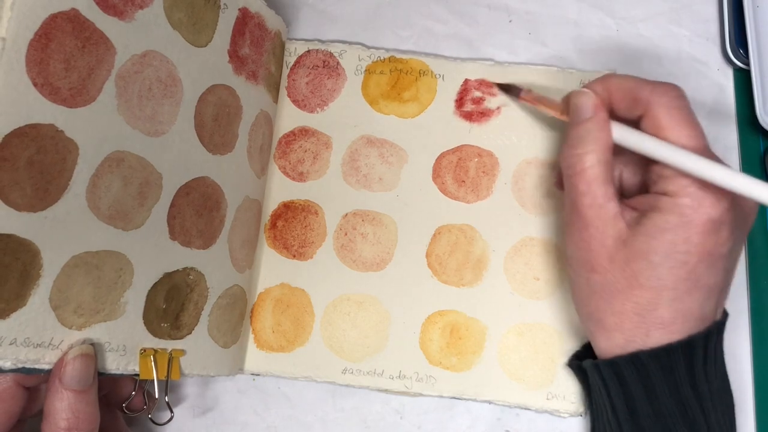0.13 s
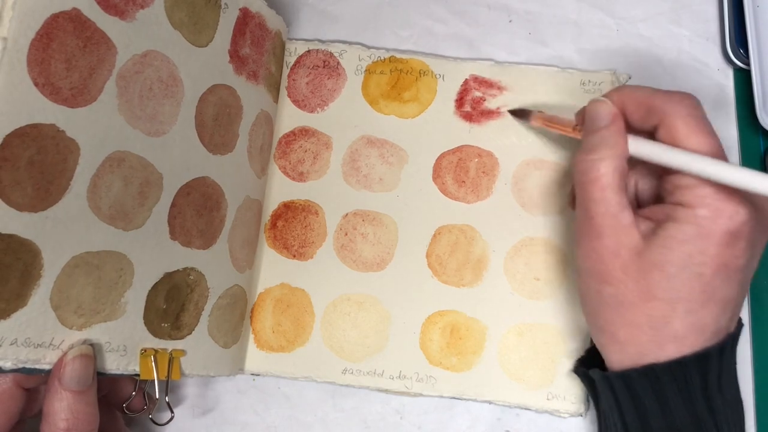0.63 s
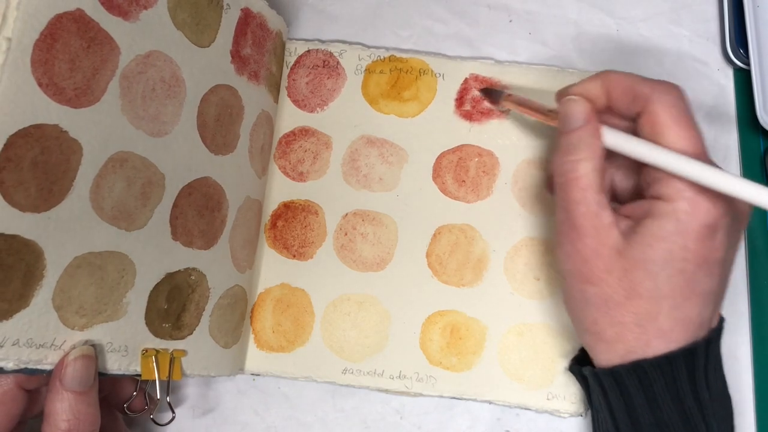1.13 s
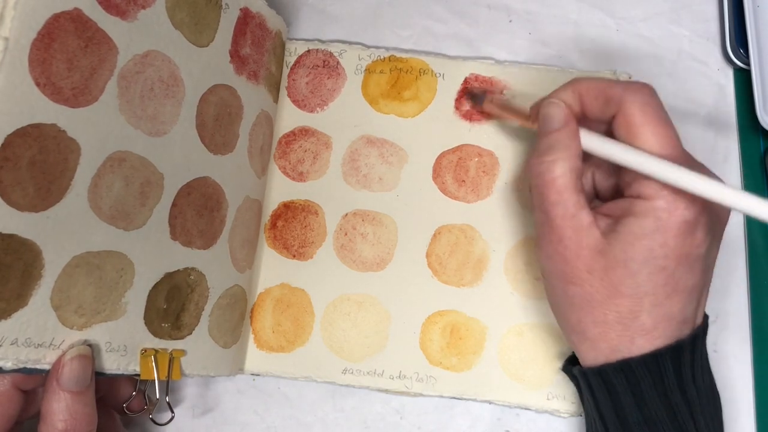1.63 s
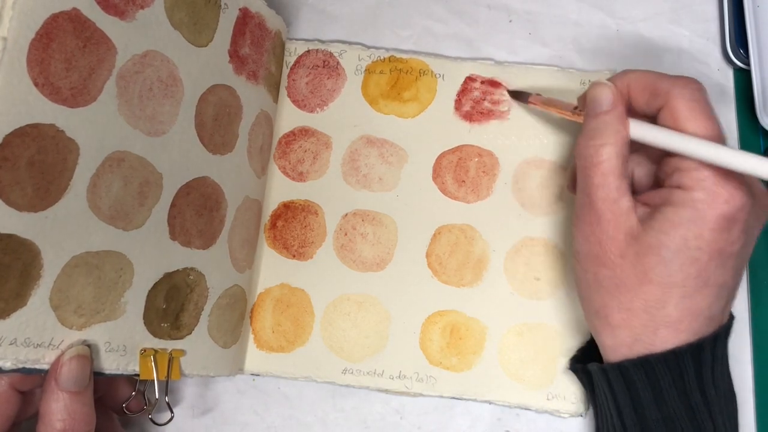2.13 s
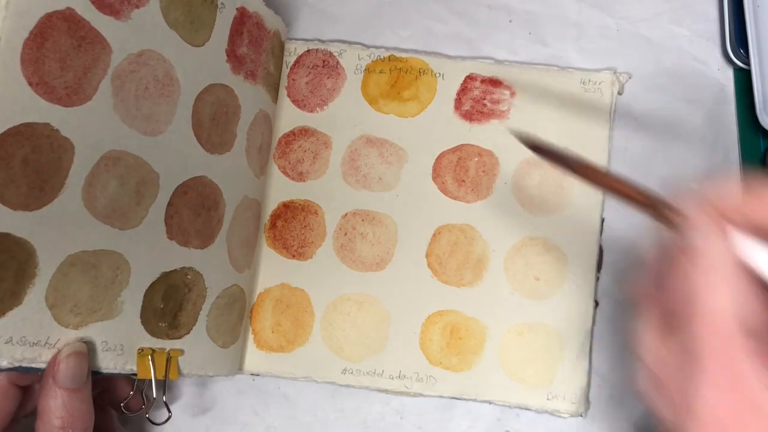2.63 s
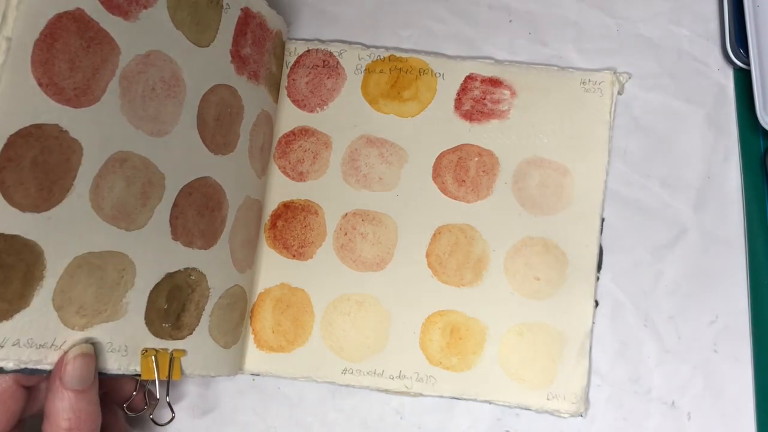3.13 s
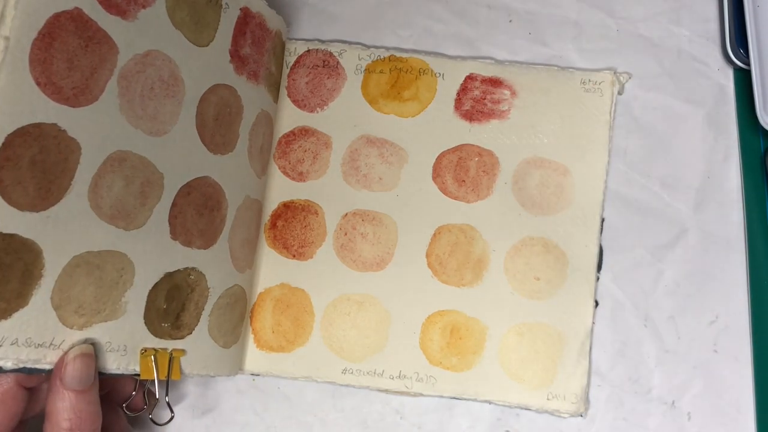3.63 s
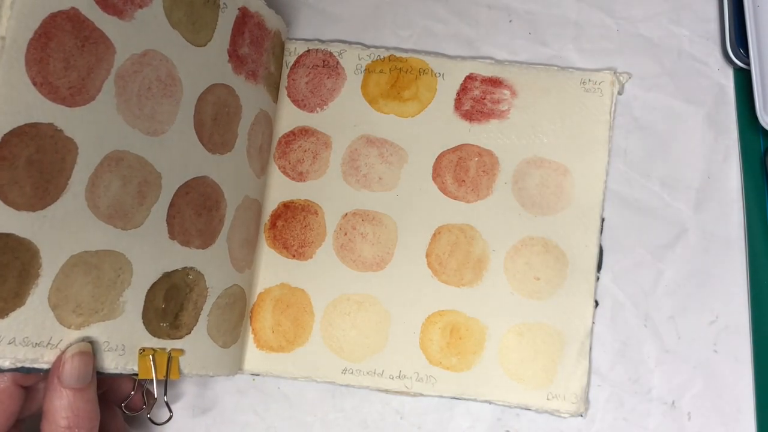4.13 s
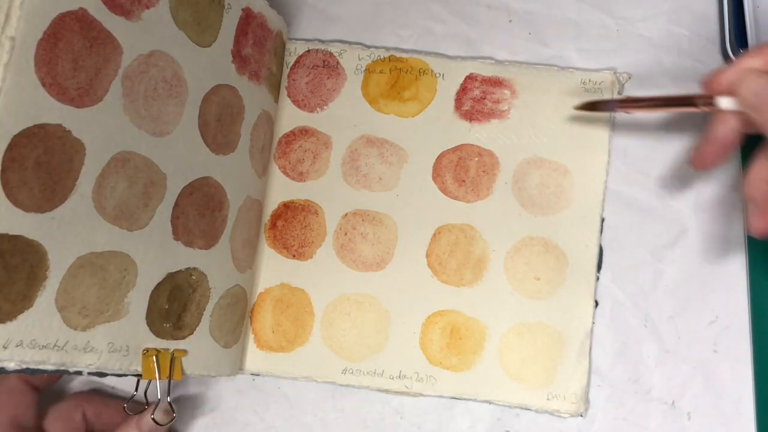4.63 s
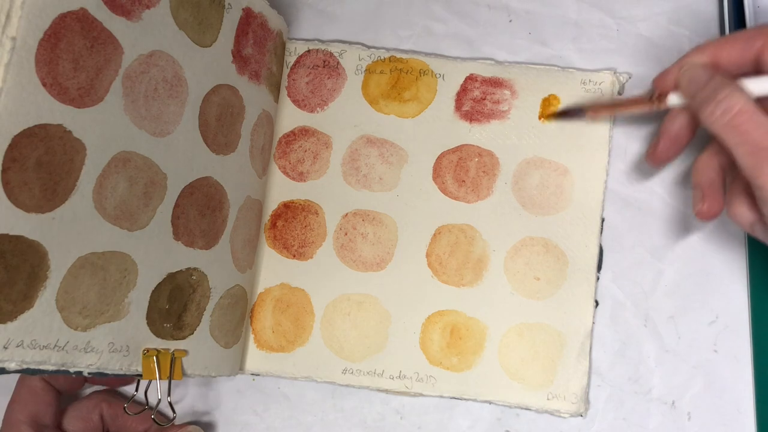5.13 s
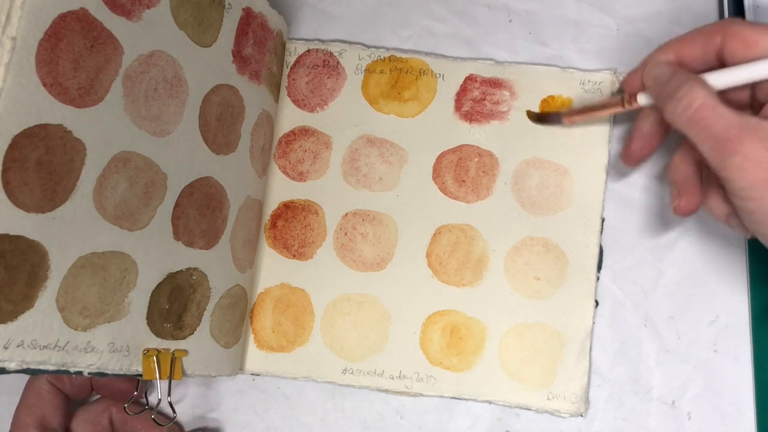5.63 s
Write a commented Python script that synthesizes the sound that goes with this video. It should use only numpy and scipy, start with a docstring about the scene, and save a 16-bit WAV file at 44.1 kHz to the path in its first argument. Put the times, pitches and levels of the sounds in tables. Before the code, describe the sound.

A quiet studio: soft low ventilation rumble, faint unsteady hums and even hiss throughout. From 0 to about 2.7 s a watercolour brush works rough paper close to the microphone, quick grainy dabs about every quarter second alternating with softer, longer strokes, some landing with a tiny tick; they gradually thin out. Low soft hand movements come near 0.9 and 2.5 s. Mostly room tone follows until 3.3 s, then a faint scrape. At arm's length the brush's metal collar taps the palette pans at 3.45 s, rattles lightly, and cracks loudly at 3.89 s with short hard ringing and room echo. Scrapes and a cluster of knocks at 4.25-4.31 s lead to another loud crack at 4.37 s, cut off by 4.43 s. The room tone drops out for an instant and returns in two quick steps. Hands bump and rustle at 4.55-4.85 s, then wetter, brighter, scratchy strokes continue to the end, around 5.75 s.

```python
"""In a quiet studio, a wet watercolour brush dabs and strokes rough paper close to the microphone,
then its ferrule (metal collar) scrapes and knocks on the pans of a palette at arm's length.
The brush is grainy filtered noise; a knock is a crack, a snap, ringing modes and a room echo.
Hands shift as short noise puffs over low rumble, hums and hiss. Just after the last knock palette
and room fade out fast; the room returns in two quick steps, the palette's ring stays cut off."""
import sys
import numpy as np
from scipy import signal
from scipy.fft import rfft, irfft, next_fast_len
from scipy.io import wavfile
from scipy.ndimage import uniform_filter1d, map_coordinates

SR = 44100
rng = np.random.default_rng(int(sys.argv[2]) if len(sys.argv) > 2 else 0)


def generate_wav(sig):
    """Save sig (samples, or channels by samples) to the path in sys.argv[1] as 16-bit PCM at SR."""
    pcm = np.round(np.clip(np.atleast_2d(sig).T, -1, 1) * 32767).astype(np.int16)
    wavfile.write(sys.argv[1], SR, pcm)


def makeup_ratio(level_db):
    """Linear amplitude ratio for a level in decibels (20 dB per factor of ten)."""
    decades = np.asarray(level_db, float) / 20
    return 10 ** decades


N = 253569  # length [samples]


# brush strokes on paper:
# (start [s], press time [s], lift time [s], sheet hiss [dB], bristle scratch above the hiss [dB])
BRUSH_STROKES = [(0, .004, 0.019, -74.5, 3), (.021, 0.02, 0.026, -57.5, -3.5), (.04, .11, .018, -71, 2),
                 (.243, 0.021, 0.028, -56.5, -0.5), (.27, .07, 0.098, -70.5, 1.5),
                 (.486, 0.0066, 0.039, -67.5, -2.5), (.5, 0.081, 0.1, -71.5, 3),
                 (0.688, 0.0068, .018, -62, -2.5), (.7, .11, .022, -73.5, 4), (.89, 0.018, 0.042, -62, -3),
                 (.92, 0.11, .03, -73, 4), (1.168, 0.0099, 0.04, -64.5, -6.5),
                 (1.185, 0.093, 0.019, -73.5, 4.5), (1.451, 0.024, 0.029, -59.5, -1.5),
                 (1.5, 0.034, 0.071, -63.5, -1.5), (1.7, 0.03, 0.061, -66, -2.5),
                 (1.865, 0.027, 0.027, -68, -1), (1.9, 0.053, 0.057, -76.5, 5),
                 (2.04, .095, .025, -75.5, 6.5), (2.23, 0.017, 0.038, -70, 2.5),
                 (2.288, 0.019, 0.031, -70.5, 5.5), (2.418, 0.009, 0.042, -64.5, -1.5),
                 (2.47, 0.015, 0.036, -70, 1), (2.53, 0.029, 0.046, -72.5, 3), (2.64, .06, .06, -83, 7.5),
                 (4.845, 0.033, 0.047, -69.5, 8), (4.88, 0.058, 0.058, -74.5, 4),
                 (5.012, 0.014, .03, -68, 1), (5.035, 0.024, .06, -68, 5), (5.11, .045, 0.068, -71.5, 5.5),
                 (5.215, 0.034, 0.048, -68.5, 8), (5.28, .055, 0.084, -75.5, 6),
                 (5.405, .025, 0.047, -66, 5.5), (5.45, 0.029, 0.029, -68, 3),
                 (5.597, 0.012, 0.038, -67, 1.5), (5.63, 0.052, 0.13, -72, 4.5)]
# resonances in the sheet's hiss: (centre [Hz], width [Hz], gain [dB])
PAPER_RESONANCES = [(2600, 430, 18), (3060, 780, 13.5)]
# resonances in the bristles' scratch: (centre [Hz], width [Hz], gain [dB])
BRISTLE_RESONANCES = [(4420, 1350, 8.5), (5420, 1000, 1.5), (6470, 1900, -1.5), (8200, 3200, 0)]
# resonance of the wet hiss, applied twice: (centre [Hz], width of one pass [Hz], gain [dB])
WET_RESONANCE = [(8200, 1400, 0)]
# colour of the fizz: (frequency [Hz], relative level [dB])
FIZZ_COLOUR = [(8000, -5.5), (10000, 1), (12000, -1), (14500, 0.5), (15700, -4), (16100, -40),
               (16500, -120)]
# colour of the paper's rustle: (frequency [Hz], relative level [dB])
RUSTLE_COLOUR = [(300, -17), (700, -10.5), (1400, -10.5), (2000, -13), (3000, -52)]
# the tip lands on the paper with a tick: (time [s], level before a 4 dB cut [dB], pitch [Hz])
TIP_TICKS = [(0.0275, -47.5, 3990), (0.49, -52, 3160), (0.6936, -53, 2530), (0.8955, -50.5, 2370),
             (1.1728, -52, 2600), (1.7022, -61, 2610), (1.8677, -65.5, 3270), (2.2327, -58, 2610),
             (2.421, -48.5, 2450), (2.537, -56, 2150), (2.699, -57, 4870), (4.8494, -61, 4210),
             (5.48, -47.5, 4690), (5.6015, -63, 4630)]


def brush():
    """Hairs slip over the tooth of the paper: grainy noise as hiss, scratch, fizz, rustle and wet hiss."""
    rustle_db = -5.5  # against the hiss
    thin_fizz_db, fresh_fizz_db, wet_db = -4, -9.5, -10.5  # against the scratch
    fresh_paint_s = 4.5  # strokes after this carry fresh paint
    long_stroke_s, short_arch, long_arch = 0.075, 1.5, 0.81  # under 1: flat top, over 1: peaked
    scratch_top_hz = 9660

    gain = np.zeros((5, N))
    for start, press, lift, hiss_db, scratch_db in BRUSH_STROKES:
        fresh = start > fresh_paint_s
        fizz_db = scratch_db + (fresh_fizz_db if fresh else thin_fizz_db)
        above_hiss_db = np.array([0, scratch_db, fizz_db, rustle_db, scratch_db + wet_db])
        layers = makeup_ratio(hiss_db + above_hiss_db) * [1, 1, 1, 1, fresh]  # wet hiss needs fresh paint
        power = short_arch if press + lift < long_stroke_s else long_arch
        pressure = arch(start, press, lift, power)
        gain = np.hypot(gain, layers[:, None] * pressure)

    slips = patchy(count=5, patchy_db=2.5)
    slips = slips * makeup_ratio(1.73 * wobble(700) + 1.27 * wobble(60))  # grain of the paper

    def bristle_response(hz):
        return resonances(BRISTLE_RESONANCES)(hz) / (1 + (hz / scratch_top_hz) ** 14)

    hiss = unit(filtered(slips[0], resonances(PAPER_RESONANCES)))
    scratch = unit(filtered(slips[1], bristle_response))
    fizz = coloured(slips[2], FIZZ_COLOUR)
    rustle = coloured(slips[3], RUSTLE_COLOUR)
    wet = unit(filtered(slips[4], lambda hz: resonances(WET_RESONANCE)(hz) ** 2))
    strokes = np.sum(gain * [hiss, scratch, fizz, rustle, wet], axis=0)
    ticks = puffs([(s, db, hz, 1.4 * hz, 0.025) for s, db, hz in TIP_TICKS])
    return strokes + ticks


# colour of the crack at each contact: (frequency [Hz], relative level [dB])
CRACK_COLOUR = [(180, -29.5), (400, -13), (850, -6), (1200, 2.5), (3000, 0), (6500, -7.5), (8800, -11),
                (9700, -20), (16000, -24.5)]
# knocks on the palette: (time [s], level before a 10 dB cut [dB], tilt of the low modes [dB],
# tilt of the high modes [dB], rattle before the decay [ms])
PALETTE_KNOCKS = [(3.446, -41, 5, -5, 4), (3.454, -30.5, -2.5, -15, 3.7), (3.527, -57, -9, -13, 4),
                  (3.587, -63, -11, -10, 2.1), (3.617, -60, -15, -10, 2.2), (3.779, -41, 4.5, -15.5, 12),
                  (3.816, -45.5, 2.5, -14.5, 4), (3.869, -40.5, 21, -11, 6), (3.8886, -13.5, 0.5, 6, 3.1),
                  (4.246, -44.5, 0, -21, 3.3), (4.25, -42.5, 14, -6, 6.9), (4.28, -51, -2, 10, 5),
                  (4.2886, -25, -2.5, 5, 5), (4.301, -25, -4.5, -8, 2.9), (4.308, -33.5, 7, -14, 3),
                  (4.374, -14, -6, 2, 3)]
# modes of the palette: (frequency [Hz], relative level [dB], time to fall 60 dB [s])
PALETTE_MODES = [(200, -16, .1), (330, -16, .1), (517, -9, .1), (700, -15, .06), (1150, 1, .07),
                 (1250, -3, .06), (1450, -6, .05), (1750, -8, .05), (1985, -1, .07), (2330, -4, .07),
                 (2550, -8, .06), (2785, -1, .07), (3100, -2, .07), (3380, -6, .06), (3600, -8, .05),
                 (4300, -6, .04), (4620, -7, .05), (5240, -11, .05), (5755, -6, .06), (6130, -9, .04),
                 (6470, -9, .04), (7330, -13, .03), (8760, -5, .022), (10400, -19, .025)]


def knocks():
    """Each knock snaps, rattles for a few ms, rings the palette's modes and spreads into the studio."""
    ring_db, snap_db, echo_db = -2, 3, -8
    crack_t60, snap_t60 = 0.042, 0.016  # time to fall 60 dB [s]
    out, t = np.zeros(N + SR), np.arange(SR // 5) / SR
    hz, mode_db, mode_t60 = np.transpose(PALETTE_MODES)[:, :, None]
    for s, db, low_db, high_db, rattle_ms in PALETTE_KNOCKS:
        # where and how hard the ferrule lands weighs low against high modes
        weight = [(600, 0.55 * low_db - 0.5), (1200, low_db), (2200, 0),
                  (4000, 0.0072), (8000, high_db), (15000, 1.03 * high_db + 3)]
        after_rattle = np.maximum(t - rattle_ms / 1000, 0)

        phase = 2 * np.pi * rng.random(hz.shape)
        strength = makeup_ratio(mode_db + along(weight, hz) + 0.46 * rng.standard_normal(hz.shape))
        rings = strength * makeup_ratio(-60 * after_rattle / mode_t60) * np.sin(2 * np.pi * hz * t + phase)
        build_up = np.minimum(t * hz / 1.4, 1)  # each mode takes 1.4 cycles to build up
        ring = np.sum(rings * build_up, axis=0) / np.linalg.norm(strength)

        colour = lambda f: makeup_ratio(along(CRACK_COLOUR, f) + along(weight, f))
        dull = unit(filtered(rng.standard_normal(len(t)), lambda f: colour(f) / (1 + f / 7000)))
        crack = dull * makeup_ratio(-60 * after_rattle / crack_t60) * np.minimum(t / 0.0007, 1)
        # the first contact is a brighter snap that dies faster than the crack
        bright = unit(filtered(rng.standard_normal(len(t)), lambda f: colour(f) * f / (f + 9000)))
        snap = bright * makeup_ratio(snap_db - 60 * t / snap_t60) * np.minimum(t / 0.0004, 1)

        # the studio answers the broad crack with a diffuse tail
        sound = makeup_ratio(echo_db) * signal.fftconvolve(crack, studio())
        sound[:len(t)] += makeup_ratio(ring_db) * ring + crack + snap
        out[round(s * SR):][:len(sound)] += makeup_ratio(db - 10.0) * sound
    return out[:N]


# the ferrule drags over the pans: (start [s], length [s], first level [dB], last level [dB])
FERRULE_DRAGS = [(3.28, .07, -79, -82), (3.428, 0.02, -79, -56), (3.785, .04, -60, -78),
                 (3.839, 0.033, -71, -55), (3.874, .016, -56.5, -58), (4.259, 0.045, -71, -48),
                 (4.296, .073, -46.5, -55)]


def drags():
    """The ferrule scrapes the pans: gritty noise in a middle band, its level sliding along each drag."""
    grit = coloured(rng.standard_normal(N) * makeup_ratio(3 * wobble(300)), CRACK_COLOUR)
    scrape = unit(filtered(grit, lambda f: f / (f + 2500) / (1 + (f / 3700) ** 8)))
    pressure = np.zeros(N)
    for s, length, first_db, last_db in FERRULE_DRAGS:
        level_db = curves([(s, first_db), (s + length, last_db)], left=-120, right=-120)[0]
        pressure += makeup_ratio(level_db)
    return uniform_filter1d(pressure, size=130) * scrape


# the studio's reverberation: (frequency [Hz], time to fall 60 dB [s])
STUDIO_DECAY = [(200, 0.59), (1200, 0.3), (3500, 0.28), (8000, 0.21), (15000, 0.16)]


def studio():
    """A fresh reverberant tail in which each frequency dies at its own speed."""
    hz, t, z = signal.stft(rng.standard_normal(SR // 2), SR, nperseg=256)
    decay = makeup_ratio(-60 * t / along(STUDIO_DECAY, hz)[:, None])
    tail = signal.istft(z * decay, SR, nperseg=256)[1]
    return np.pad(tail / np.linalg.norm(tail), (130, 0))  # starts 130 samples late


# hands shift on the sketchbook, table and brush: (time [s], level before a 4 dB cut [dB],
# pitch [Hz], width of one of two filter passes [Hz], time to fall 60 dB [s])
HAND_SHIFTS = [(.905, -53, 158, 122, 0.31), (2.46, -51, 150, 80, 0.088), (2.487, -55, 885, 506, .034),
               (3.29, -68, 1190, 250, 0.35), (3.765, -67, 9900, 4000, 0.29), (3.862, -65, 9900, 3010, .14),
               (4.548, -53, 252, 150, .078), (4.745, -67.5, 5970, 7000, 0.43), (4.756, -59, 2310, 900, 0.1),
               (4.757, -53, 1400, 400, .04), (4.761, -45, 1160, 450, 0.068),
               (4.778, -54.5, 3420, 1500, 0.039), (4.78, -51, 1156, 302, 0.19),
               (4.819, -49.5, 3680, 3500, 0.084), (4.828, -44, 480, 550, 0.048)]


def handling():
    """Hands shift on the sketchbook, table and brush, each time a short puff of noise."""
    return puffs(HAND_SHIFTS)


# colour of the room tone: (frequency [Hz], relative level [dB])
ROOM_COLOUR = [(15, -61), (25, -17.5), (87, -10), (120, -14.5), (157, -7), (236, -12.5), (301, -11.5),
               (326, -14.5), (575, -16.5), (624, -18), (714, -20), (1650, -27), (1790, -28), (4610, -25),
               (16000, -32)]
# wavering hums: (frequency [Hz], middle of the wavering amplitude [dB])
ROOM_HUMS = [(151, -75.5), (301, -77)]
# the midrange rustle swells as the arm moves: (start [s], rise [s], fall [s], level [dB])
ARM_STIRS = [(2.4, 0.17, 0.51, -76.5), (3.3, 0.34, 0.65, -82), (4.44, 0.11, 0.28, -74),
             (5.4, .22, 0.26, -85)]


def room_tone():
    """Ventilation rumble with two unsteady hums, a faint rustle and an even hiss."""
    split_hz = 600  # rumble below, hiss above
    rumble_db, rustle_rest_db, hiss_db = -69, -79, -75
    t = np.arange(N) / SR
    noise = coloured(rng.standard_normal(N), ROOM_COLOUR)
    low = filtered(noise, lambda hz: 1 / (1 + (hz / split_hz) ** 4))
    hiss = makeup_ratio(hiss_db) * unit(noise - low)

    hums = np.zeros(N)
    for hz, db in ROOM_HUMS:
        hums += makeup_ratio(db + 1.4 * wobble(6.3)) * np.sin(2 * np.pi * hz * t + 1.52 * wobble(8.1))

    rumble = makeup_ratio(rumble_db + 0.52 * wobble(3.09) + 1.4 * wobble(10)) * unit(low)

    stir = makeup_ratio(rustle_rest_db) + sum(makeup_ratio(db) * arch(s, rise, fall, 2.5) for s, rise, fall, db in ARM_STIRS)
    rustle_colour = [(400, -30.5), (800, -3.5), (2500, -9), (5000, -20.5)]  # (Hz, dB)
    rustle = stir * coloured(rng.standard_normal(N), rustle_colour)
    return rumble + hums + rustle + hiss


def dip():
    """Gains of palette and room: both sag, then drop; only the room returns, in two quick steps."""
    sag_s, sag_db_per_s = 4.40, 300
    drop_s, drop_db_per_s = 4.425, 3000  # adds to the sag
    deepest_db = -28  # floor for the room
    back_s, half_back_db, half_back_for_s = 4.44, -9, 0.014
    t = np.arange(N) / SR
    fade_db = -sag_db_per_s * np.maximum(t - sag_s, 0) - drop_db_per_s * np.maximum(t - drop_s, 0)
    back_db = np.where(t < back_s + half_back_for_s, half_back_db, 0)
    room_db = np.where(t < back_s, np.maximum(fade_db, deepest_db), back_db)
    return makeup_ratio(fade_db), uniform_filter1d(makeup_ratio(room_db), size=130)


def unit(x):
    """x at rms 1."""
    return x / np.sqrt(np.mean(x ** 2) + 1e-20)


def along(points, hz):
    """(Hz, value) points read on a log frequency axis."""
    f, v = np.transpose(points)
    return np.interp(np.log(hz + 1), np.log(f + 1), v)


def curves(rows, **ends):
    """One value per sample for each column after the time."""
    s, *cols = np.transpose(rows)
    return [np.interp(np.arange(N) / SR, s, c, **ends) for c in cols]


def wobble(rate):
    """A smooth random curve, rate knots a second."""
    knots = rng.standard_normal(int(N * rate / SR) + 4)
    return map_coordinates(knots, [np.arange(N) * rate / SR])


def filtered(x, response):
    """x times a response of frequency."""
    m = next_fast_len(len(x) + 8192)
    return irfft(rfft(x, m) * response(np.fft.rfftfreq(m, 1 / SR)), m)[:len(x)]


def coloured(x, spectrum):
    """x through a (Hz, dB) spectrum, at rms 1."""
    return unit(filtered(x, lambda hz: makeup_ratio(along(spectrum, hz))))


def resonances(modes):
    """Causal response of (Hz, width Hz, dB) resonances."""
    return lambda f: sum(makeup_ratio(db) * 1j * f * w / (c * c - f * f + 1j * f * w) for c, w, db in modes)


def puffs(rows):
    """Sudden noise bursts around one pitch that die away, at most 0.2 s long."""
    out, t = np.zeros(N + SR), np.arange(SR // 5) / SR
    for s, db, hz, width_hz, t60 in rows:
        band = resonances([(hz, width_hz, 0)])
        noise = unit(filtered(rng.standard_normal(len(t)), lambda f: band(f) ** 2))
        envelope = makeup_ratio(db - 4 - 60 * t / t60) * np.minimum(t / 0.0006, 1)
        out[round(s * SR):][:len(t)] += envelope * noise
    return out[:N]


def patchy(count, patchy_db):
    """Noises whose colour shifts in random patches of time and frequency."""
    z = signal.stft(rng.standard_normal((count, N)), nperseg=256)[2]
    field = uniform_filter1d(rng.standard_normal(z.shape[1:]), size=4, axis=0)
    field = uniform_filter1d(field, size=10, axis=1)
    return signal.istft(z * makeup_ratio(patchy_db * unit(field)), nperseg=256)[1][:, :N]


def arch(start, rise, fall, power):
    """A smooth rise to 1 and a fall back to 0."""
    u = np.interp(np.arange(N) / SR, [start, start + rise, start + rise + fall], [0, 1, 0])
    return np.sin(np.pi / 2 * u) ** power


def scene():
    """Brush, hands, palette and room together, with the brief dip."""
    palette_gain, room_gain = dip()
    close = brush() + handling()
    palette = knocks() + drags()
    return (close + palette_gain * palette + room_gain * room_tone())[None]


def roll_off(x):
    """The treble ends steeply here."""
    return signal.sosfilt(signal.butter(12, 16750, fs=SR, output="sos"), x)


def record(dry):
    """The microphone drops the deepest bass; nothing above 16.7 kHz is kept."""
    finished = filtered(dry[0], lambda hz: (hz < 16700) / (1 + (35 / (hz + 1)) ** 4))
    return roll_off(finished[None])


dry = scene()
out = record(dry)
generate_wav(out)
```